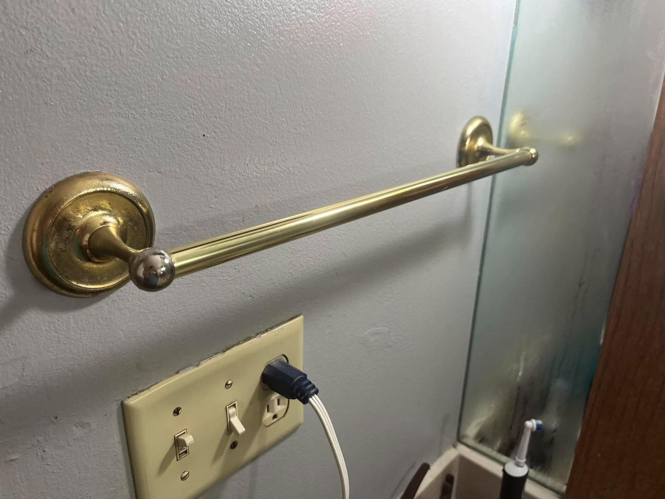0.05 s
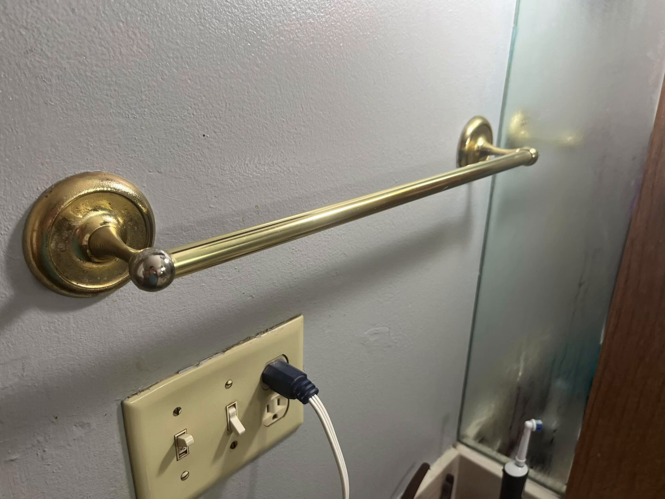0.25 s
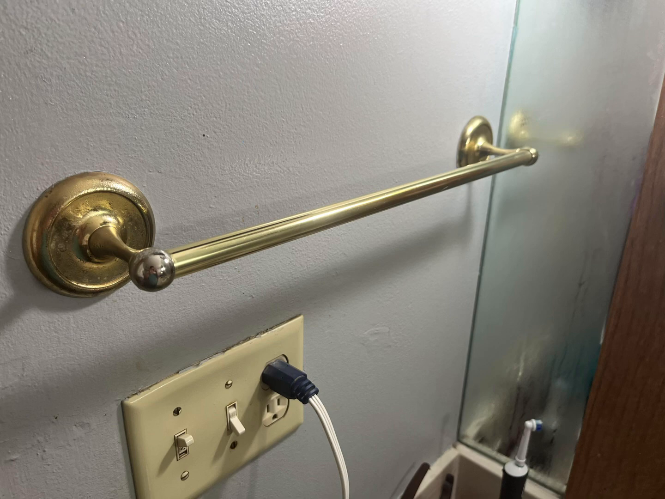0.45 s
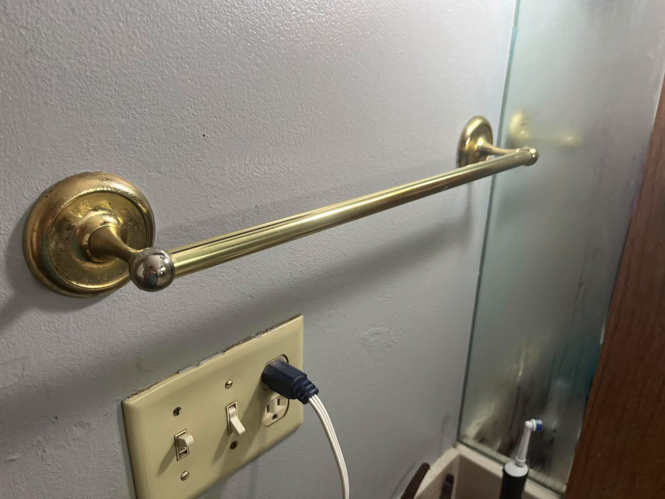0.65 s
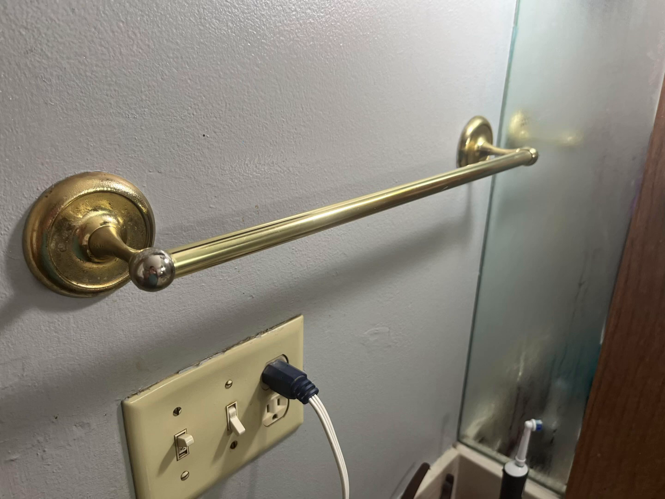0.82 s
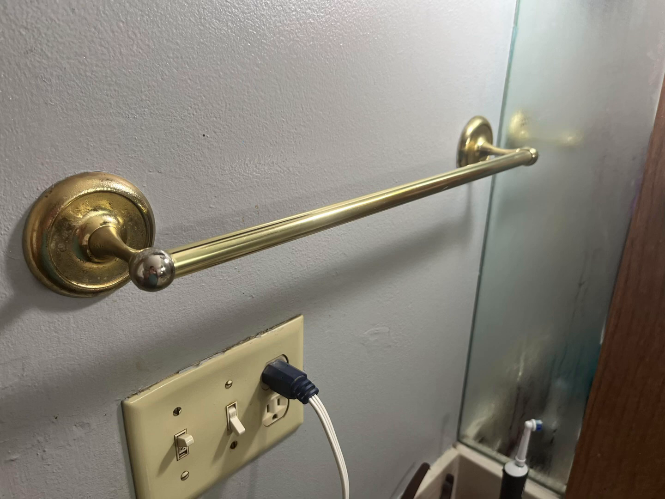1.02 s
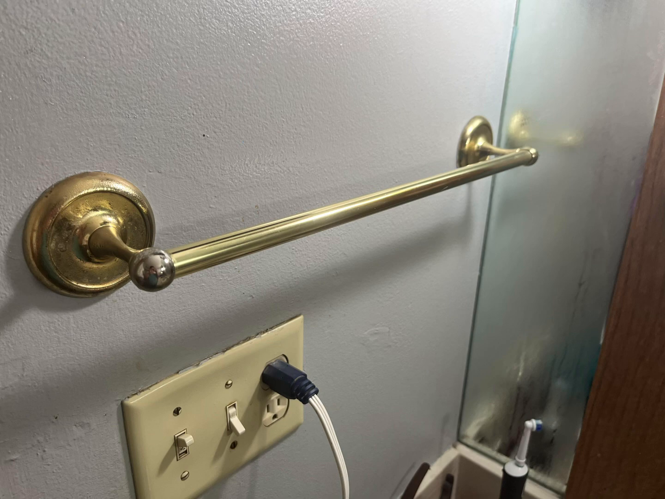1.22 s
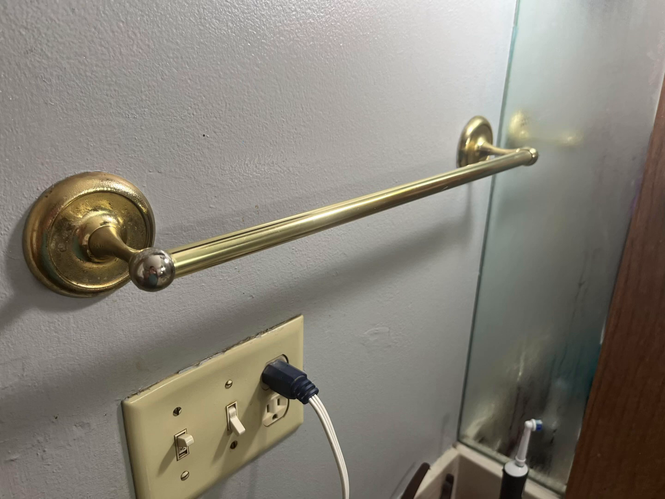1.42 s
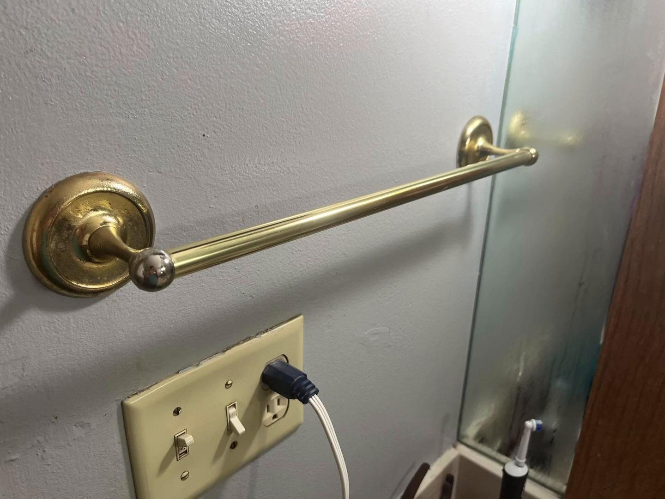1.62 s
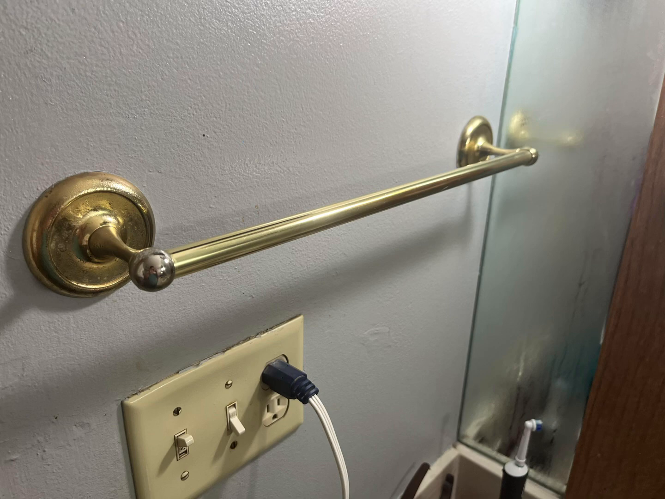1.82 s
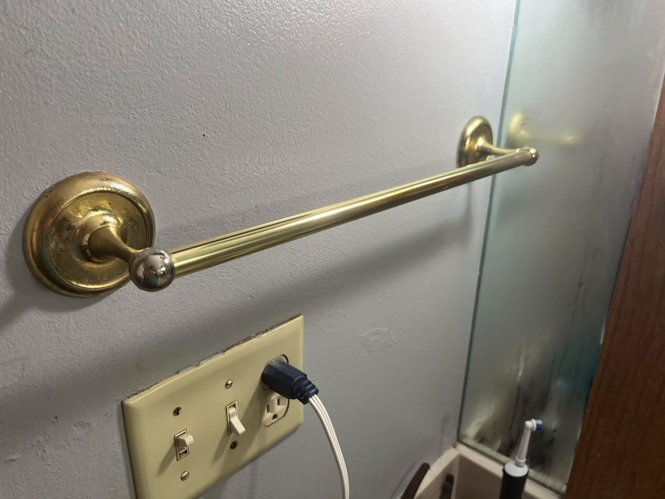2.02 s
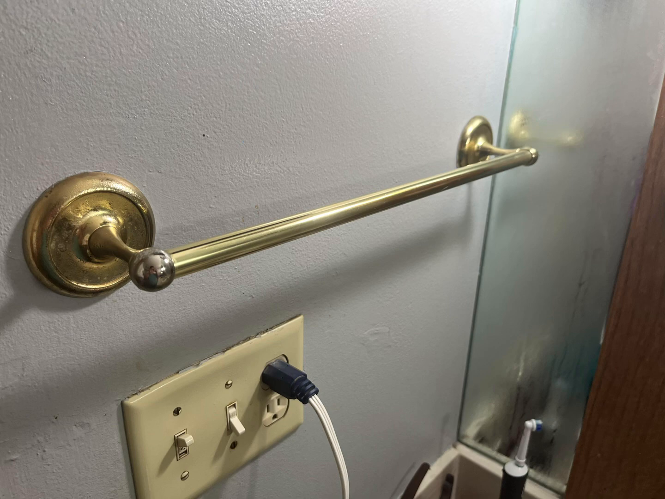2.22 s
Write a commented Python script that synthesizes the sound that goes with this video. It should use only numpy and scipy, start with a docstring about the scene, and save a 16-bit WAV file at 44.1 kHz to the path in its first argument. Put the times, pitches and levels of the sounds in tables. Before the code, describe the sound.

A metal towel bar grinds and gives a sharp, high, ringing squeak at about 0.25 seconds, close up in a small bathroom. After a soft knock, it scrapes again from 0.8 to 1.2 seconds with stuttering squeaks and chatter, over faint hand rubbing and low wall rumble. A light knock comes at 1.3 seconds and one short, bright squeak at 1.65, then quiet room tone with a faint rub.

```python
"""A brass towel bar grinds and squeaks as a hand twists it to and fro in its wall posts.
Skin hisses along the tube. The dry joint grinds in tiny slips, catches in very short stick-slip
squeaks, most near 3 kHz, and chatters, all of which sets the tube ringing. The loose posts knock,
the hollow wall rumbles and lurches, and a small, hard bathroom rings on over a low room tone."""
import sys
import numpy as np
from scipy import signal
from scipy.fft import rfft, irfft
from scipy.io import wavfile

SR = 44100
rng = np.random.default_rng(int(sys.argv[2]) if len(sys.argv) > 2 else 0)


def put_to_file(sound):
    """Save the sound as 16-bit audio at rate SR, in the file named by the first command-line argument."""
    columns = np.atleast_2d(sound).T  # one column per channel
    safe = np.clip(columns, -1, 1)
    whole_steps = np.round(safe * 32767)
    wavfile.write(sys.argv[1], SR, whole_steps.astype(np.int16))


N = 103635
T = np.arange(N) / SR


def from_db(db):
    """Decibels to gain."""
    return 10 ** (np.asarray(db) / 20)


def unit_power(x):
    """Scale to an RMS of one."""
    return x / np.sqrt(np.mean(x ** 2) + 1e-20)


def at_hz(curve, hz):
    """Read a curve on a log-frequency axis."""
    points_hz, values = np.transpose(curve)
    return np.interp(np.log(hz + 1e-3), np.log(points_hz), values)


def coloured(x, colour):
    """EQ a steady signal, with a steep low cut under the curve's first point; unit power."""
    hz = np.arange(N // 2 + 1) * SR / N
    low_cut = np.minimum(hz / colour[0][0], 1) ** 3
    return unit_power(irfft(rfft(x) * from_db(at_hz(colour, hz)) * low_cut, N))


def noise(colour):
    """Smooth noise through an EQ curve."""
    return coloured(rng.standard_normal(N), colour)


def drift(rate_hz):
    """A smooth random modulator; unit power."""
    pole = np.exp(-2 * np.pi * rate_hz / SR)
    wander = signal.lfilter([1], [1, -2 * pole, pole * pole], rng.standard_normal(2 * N))
    return unit_power(wander[N:])


def slips(per_s, spread_db=2):
    """Friction grains: tiny clicks of uneven size at random times; unit power."""
    size = from_db(spread_db * np.minimum(rng.exponential(1, N), 4)) * rng.choice([-1, 1], N)
    return unit_power(size * (rng.random(N) < per_s / SR))


def gate(start, length, attack_s, release_s):
    """An envelope that swells, holds and dies away."""
    opening = (1 + np.tanh((T - start) / attack_s / 2)) / 2
    closing = (1 - np.tanh((T - start - length) / release_s / 2)) / 2
    return opening * closing


def blow(start, decay_s, rise_s=.001):
    """An impact envelope: sudden rise, exponential decay."""
    age = np.maximum(T - start, 0)
    return np.exp(-age / decay_s) * (1 - np.exp(-age / rise_s))


def ring(drive, modes, t60_scale=1):
    """A bank of decaying resonators; a broadband drive keeps its power."""
    out, power = 0, 0
    for hz, db, t60 in modes:
        radius = np.exp(-np.log(1000) / (t60 * t60_scale * SR))
        feedback = [1, -2 * radius * np.cos(2 * np.pi * hz / SR), radius * radius]
        out = out + from_db(db) * signal.lfilter([.5, 0, -.5], feedback, drive + 1e-18)
        power += from_db(db) ** 2 / (2 * (1 - radius * radius))
    return out / np.sqrt(power)


# The brass tube's modes. Each row: pitch in Hz, relative level in dB.
TUBE_MODES = [(1332, -9.5), (2098, -13.5), (2410, -6.5), (2620, -3.5), (2835, -6), (2940, -3.5),
              (3015, -11.5), (3170, -7.5), (4003, -6), (4060, -9), (4125, -8.5), (4300, -11.5), (5280, -16),
              (5708, 0.5), (5838, -1), (5953, -5.5), (7292, 1.5), (7480, -4.5), (8000, -6), (8455, -10.5),
              (8670, -5), (8790, -11), (9150, -10), (9500, -5), (10500, -9.5), (11600, -10.5),
              (12100, -12.5), (13200, -8.5), (14400, -8.5), (14900, -10)]
def tube(drive):
    """The tube rings briefly under the contact and faintly on after it; higher modes die sooner."""
    modes = [(hz, db, .21 * (3007 / hz) ** .2) for hz, db in TUBE_MODES]
    gripped = ring(drive, modes, t60_scale=.12)
    return gripped + from_db(-8) * ring(drive, modes)


# Pitches at which the tube hardly radiates. Each row: centre in Hz, width in Hz.
TUBE_NOTCHES = [(1150, 2100), (3570, 170), (4850, 110), (6800, 260), (9950, 51), (12750, 880)]
def radiated(x):
    """Carve the gaps between the tube's groups of modes."""
    for hz, width_hz in TUBE_NOTCHES:
        x = signal.lfilter(*signal.iirnotch(hz, hz / width_hz, fs=SR), x + 1e-18)
    return x


# Fader ride of the sliding skin. Each row: time in seconds, relative level in dB.
RUB_LEVELS = [(0, -51), (.13, -50.5), (.22, -47.5), (.3, -54.5), (.39, -52.5), (.45, -52.5), (.55, -79),
              (.76, -85), (.84, -47.5), (1.0, -42), (1.15, -42.5), (1.3, -56.5), (1.44, -78), (1.54, -65.5),
              (1.62, -63), (1.72, -83), (2.14, -85.5), (2.23, -59.5), (2.29, -57.5), (2.35, -96)]
# EQ of its hiss. Each row: frequency in Hz, gain in dB.
RUB_COLOUR = [(530, -33.5), (900, -21.5), (1230, -27), (1360, 3), (1550, -18), (2090, 1.5), (2450, -8),
              (2890, 0.5), (3430, -1.5), (5960, -3.5), (6640, -8.5), (7490, -2), (11400, -16.5),
              (13200, -14), (16000, -24)]
def rubbing():
    """Skin slides along the tube with a fine, flickering hiss, and the tube sings faintly."""
    level = from_db(np.interp(T, *np.transpose(RUB_LEVELS)) + .86 * drift(36))
    hiss = level * coloured(slips(per_s=12000), RUB_COLOUR)
    return from_db(-2.5) * hiss + from_db(-17) * tube(hiss)


# Fader ride of the moving hand. Each row: time in seconds, level in dB.
RUSTLE_LEVELS = [(0, -58.5), (.2, -62), (.36, -70), (.45, -49), (.6, -58.5), (.74, -58), (1.3, -74.5),
                 (1.55, -59), (1.7, -68.5), (2.15, -73), (2.26, -56), (2.35, -70)]
# EQ of its rustle. Each row: frequency in Hz, gain in dB.
RUSTLE_COLOUR = [(130, 7.5), (300, -5), (520, -0.5), (800, -7), (1100, -17), (1800, -15.5), (3000, -22.5),
                 (6000, -38)]
def rustle():
    """The hand moves with a soft, dull rustle."""
    return from_db(np.interp(T, *np.transpose(RUSTLE_LEVELS))) * noise(RUSTLE_COLOUR)


# The joint's two turns. Each row: time in seconds, relative grind and post drone levels in dB.
FIRST_TURN = [(0.0, -52, -60.5), (0.046, -65, -54), (0.144, -62.5, -60), (0.158, -38.5, -40),
              (0.21, -44, -42.5), (0.23, -23, -26.5)]
SECOND_TURN = [(0.82, -63, -44), (0.866, -48.5, -39), (0.881, -28, -23.5), (0.896, -28, -44),
               (0.909, -24, -26), (0.928, -30.5, -29.5), (1.022, -53, -50.5), (1.046, -44, -31.5),
               (1.063, -31, -35.5), (1.089, -24.5, -20), (1.098, -30.5, -39.5), (1.142, -17.5, -21.5)]
# EQ of the grind. Each row: frequency in Hz, gain in dB.
GRIND_COLOUR = [(530, -46), (900, -13), (1750, -1), (1970, -0.5), (2170, -6.5), (2960, -6.5), (3640, -8),
                (4310, -7.5), (5100, -22.5), (5820, -14.5), (7490, -11), (8550, -27.5), (9770, -13.5),
                (10600, -34.5), (16000, -23.5)]
# Modes of the posts and wall plates. Each row: pitch in Hz, relative level in dB, free T60 in seconds.
POST_MODES = [(257, -12, .2), (424, -11.5, 0.12), (524.4, -3, 0.43), (505, 3.5, 0.024), (645, 2, 0.079),
              (691, -0.5, 0.059), (770, -3, 0.043), (806, -15.5, 0.18)]
def grinding():
    """Dense slips in the dry joint crackle and drive the tube and the posts."""
    grind, drone, grains = 0, 0, slips(per_s=7000)
    # The firm grip of the first turn chokes the posts' ring.
    for turn, t60_scale in ((FIRST_TURN, .22), (SECOND_TURN, 1)):
        times, grind_db, post_db = np.transpose(turn)
        turning = gate(times[0], times[-1] - times[0], attack_s=.0018, release_s=.006)
        grind = grind + turning * from_db(np.interp(T, times, grind_db))
        post_drive = turning * from_db(np.interp(T, times, post_db)) * grains
        drone = drone + ring(post_drive, POST_MODES, t60_scale)
    crackle = grind * coloured(grains, GRIND_COLOUR)
    return from_db(-10) * crackle + from_db(-13) * tube(crackle) + from_db(-6) * drone


# Fader ride of the wall. Each row: time in seconds, relative level in dB.
RUMBLE_LEVELS = [(0.0, -47), (0.084, -43), (0.258, -42), (0.274, -46), (0.362, -71), (0.609, -49),
                 (0.666, -66), (0.786, -45), (0.88, -42.5), (0.908, -37.5), (1.134, -40.5), (1.182, -72),
                 (1.288, -87), (1.344, -51), (1.44, -43)]
# EQ of its rumble. Each row: frequency in Hz, gain in dB.
RUMBLE_COLOUR = [(20, -35), (45, -12), (75, -8), (125, 1.5), (180, -11.5), (400, -25.5), (900, -58.5)]
def wall_rumble():
    """The hollow wall rumbles and shudders while the bar is worked."""
    times, db = np.transpose(RUMBLE_LEVELS)
    shudder_hz = 73.1 * (1 + .17 * drift(8.9))
    shudder = np.sqrt(2) * np.sin(2 * np.pi * np.cumsum(shudder_hz) / SR)
    working = gate(times[0], times[-1] - times[0], attack_s=.0022, release_s=.082)
    level = working * from_db(np.interp(T, times, db))
    return level * (from_db(-3) * noise(RUMBLE_COLOUR) + from_db(-2) * shudder)


# EQ of the quiet air. Each row: frequency in Hz, gain in dB.
ROOM_TONE_COLOUR = [(15, -72.5), (25, -35.5), (70, -8.5), (80, -2), (102, -9), (161, -18.5), (354, -31.5),
                    (531, -29.5), (695, -42.5), (1650, -48), (2110, -55), (3820, -54), (5200, -61.5),
                    (16000, -74)]
def room_tone():
    """A steady, bass-heavy bed of quiet air."""
    return from_db(-54) * noise(ROOM_TONE_COLOUR)


# EQ of a squeak's in-between partials. Each row: frequency in Hz, gain in dB.
SUBHARMONIC_COLOUR = [(1400, -30), (2100, -12), (4250, -1), (5300, -11.5), (7350, -0.5), (8500, -9),
                      (10500, -22)]
def subharmonics(phase, hz, cycles):
    """A swing that repeats only every second or third cycle adds partials between the harmonics."""
    ratios = [k / cycles for k in range(1, 4 * cycles) if k % cycles]
    return sum(from_db(at_hz(SUBHARMONIC_COLOUR, r * hz)) * np.sin(r * phase) for r in ratios)


# EQ of metal contact, for squeak rasp and chatter. Each row: frequency in Hz, gain in dB.
CONTACT_COLOUR = [(900, -34), (2500, 3.5), (4200, 11), (8000, 1), (11000, -2), (15000, -6), (16000, -22)]
CONTACTS_PER_S = 3700
# Squeaks and low groans. Each row: start and length in seconds, first and last pitch in Hz, level in dB,
# second and third harmonic in relative dB, roughness from 0 to 1, cycles before the swing repeats,
# subharmonic gain in dB.
SQUEAKS = [(0.144, .05, 2690, 2560, -43, -14, -27.5, .7, 1, 12),
           (0.212, .014, 2543, 2455, -30.5, -19.5, -35, .3, 1, 0),
           (0.2358, 0.012, 3110, 3048, -7, -17, -11.5, .3, 3, -25.5),
           (0.2523, 0.0085, 3115, 2903, -9, -0.5, -8, .15, 3, -23),
           (0.277, .021, 2966, 2915, -25.5, -12, -3.5, 0.48, 2, -2.5),
           (0.777, 0.017, 543.6, 566, -29.5, -26, -16, 0.02, 1, 0),
           (0.879, .024, 4640, 4640, -33.5, -30, -35.5, .5, 1, 0),
           (0.88, .014, 2927, 2870, -28.5, -18.5, -22, .5, 1, 0),
           (0.906, 0.009, 4540, 4480, -18.5, -31, -35.5, .55, 1, 0),
           (0.912, .05, 4376, 4250, -32, -31, -35, .8, 1, 0),
           (0.93, 0.006, 2935, 3090, -23, -25, -22.5, 0.4, 1, 0),
           (0.95, .009, 3058, 3005, -25.5, -21, -33.5, .3, 1, 2),
           (0.986, 0.014, 2980, 3110, -47.5, 14.5, -20.5, 0.3, 1, 0),
           (1.056, .018, 687, 701, -27, -18, -25, 0.4, 1, 0),
           (1.064, 0.02, 2480, 2526, -28.5, -20.5, -20.5, .6, 1, 0),
           (1.0937, 0.0039, 2690, 2745, -11, -21, -26, 0.2, 1, 0),
           (1.097, 0.0045, 3185, 2950, -15, 14.5, 6, .15, 1, 0),
           (1.109, .006, 2920, 2943, -18.5, -8, -17, 0.3, 2, 6),
           (1.123, 0.006, 4205, 3930, -13.5, -19, -28, .3, 1, 0),
           (1.644, .013, 3200, 3192, -8.5, -8, -7, 0.25, 3, -25.5)]
def squeaks():
    """The joint sticks and slips in gliding tones that brighten as they swell; the rasp rings the tube."""
    tones, rasp = 0, 0
    wobble, flutter = np.tanh(drift(210)), np.tanh(drift(260))
    for start, length, first_hz, last_hz, db, second_db, third_db, rough, cycles, sub_db in SQUEAKS:
        swing = gate(start, length, attack_s=.0016, release_s=.0013)
        level = from_db(db + 3.9 * rough * flutter)
        progress = (T - start) / length
        sag = .03 * np.exp(-((progress - .36) / .26) ** 2)   # the pitch dips as the grip tightens
        glide_hz = np.interp(T, [start, start + length], [first_hz, last_hz])
        hz = glide_hz * (1 - sag + .045 * rough * wobble)
        phase = 2 * np.pi * np.cumsum(hz * (T > start - length)) / SR
        harmonics_db = [second_db, third_db, third_db - 11.5, third_db - 9]
        partials = sum(from_db(h) * np.sin(k * phase) for k, h in enumerate(harmonics_db, start=2))
        partials = partials + from_db(sub_db) * subharmonics(phase, (first_hz + last_hz) / 2, cycles)
        tones = tones + level * (swing * np.sin(phase) + swing ** 3 * partials)
        rasp = rasp + level * (swing * rough) ** 2
    hiss = from_db(-28) * rasp * noise(CONTACT_COLOUR)
    ringing = from_db(-13) * tube(rasp * slips(CONTACTS_PER_S))
    return tones + radiated(hiss + ringing)


# EQs of a knock's thud and tick. Each row: frequency in Hz, gain in dB.
THUD_COLOUR = [(70, -18), (135, 2), (240, 3), (390, 3), (600, -11), (1200, -47)]
TICK_COLOUR = [(500, -11), (1500, 10), (2600, 10), (4500, 6.5), (8000, -3), (15000, -34)]
# Knocks of the loose bar. Each row: start and contact decay in seconds, then the relative levels
# of thud, post ring and tick in dB.
KNOCKS = [(0.219, 0.0075, -44, -42.5, -39.5), (0.414, 0.0089, -44, -45, -49), (0.761, 0.013, -40, -34, -36),
          (0.8747, 0.0053, -40, -37.5, -21.5), (1.326, 0.013, -31, -42.5, -31),
          (1.724, 0.013, -33, -61, -85), (1.821, 0.0034, -70, -71.5, -56)]
def knocks(thud_lag_s=.0026):
    """The bar shifts in its play: a tick, the ring of the posts, then a thud in the wall."""
    thud, post, tick = 0, 0, 0
    for start, decay_s, thud_db, post_db, tick_db in KNOCKS:
        contact = blow(start, decay_s)
        tick = tick + from_db(tick_db) * contact
        post = post + from_db(post_db) * contact
        thud = thud + from_db(thud_db) * blow(start + thud_lag_s, decay_s=.018)
    thuds = thud * noise(THUD_COLOUR)
    ringing = from_db(6) * ring(post * rng.standard_normal(N), POST_MODES)
    return thuds + ringing + tick * noise(TICK_COLOUR)


# The joint's rattles on the tube. Each row: start in seconds, length in seconds, relative level in dB.
CHATTERS = [(0.237, 0.0078, -16), (0.273, 0.015, -24.5), (1.094, 0.0034, -19), (1.103, 0.006, -14),
            (1.119, 0.0032, -16), (1.143, 0.022, -29)]
def chatter():
    """Bursts of hard metal contacts crackle and ring the tube as the joint breaks free."""
    force = sum(from_db(db) * gate(start, length, attack_s=.00029, release_s=.003)
                for start, length, db in CHATTERS)
    contacts = slips(CONTACTS_PER_S)
    ringing = from_db(-2) * tube(force * contacts)
    crackle = from_db(-11) * force * coloured(contacts, CONTACT_COLOUR)
    return radiated(ringing + crackle)


# Heaves of the wall. Each row: start in seconds, frequency in Hz, relative level in dB.
LURCHES = [(0.271, 48.8, -23), (1.11, 45.55, -25.5)]
def wall_lurches():
    """The wall gives one deep, soft, heavily damped bump each time the joint gives way."""
    return sum(from_db(db) * blow(start, decay_s=.0027) * np.sin(2 * np.pi * hz * (T - start))
               for start, hz, db in LURCHES)


# The bathroom's reverb time. Each row: frequency in Hz, T60 in seconds.
ROOM_T60 = [(150, .45), (700, .35), (3000, .28), (8000, .3), (15000, .28)]
def bathroom(send, predelay_s=.0073):
    """Dense reflections from hard walls, dying band by band."""
    t, tail = T[:SR * 3 // 4], 0
    edges_hz = np.geomspace(80, 18000, 9)
    for low, high in zip(edges_hz, edges_hz[1:]):
        bandpass = signal.butter(2, [low, high], "band", fs=SR, output="sos")
        band = signal.sosfilt(bandpass, rng.standard_normal(len(t)))
        t60 = at_hz(ROOM_T60, np.sqrt(low * high))
        tail = tail + band * np.exp(-np.log(1000) * t / t60)
    tail = tail * np.clip(t / predelay_s - 1, 0, 1)
    return signal.fftconvolve(send, tail / np.sqrt(np.sum(tail ** 2)))[:N]


def scene():
    """A mono mix: the bar up close, its squeaks sent lightly to the reverb, the wall and air left dry."""
    squeal = squeaks()
    handling = grinding() + chatter() + rubbing() + rustle() + knocks()
    reverb = bathroom(from_db(-14.5) * squeal + from_db(-8) * handling)
    return (squeal + handling + reverb + wall_rumble() + wall_lurches() + room_tone())[None]


def record(dry):
    """A steep high cut on the whole mix."""
    cutoff_hz = 15800
    return signal.sosfilt(signal.ellip(12, .3, 80, cutoff_hz, fs=SR, output="sos"), dry)


dry = scene()
out = record(dry)
put_to_file(out)
```